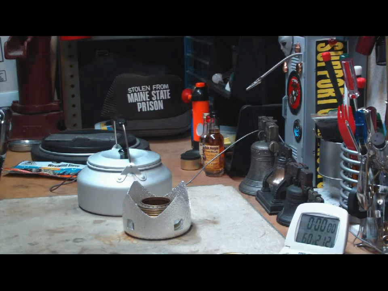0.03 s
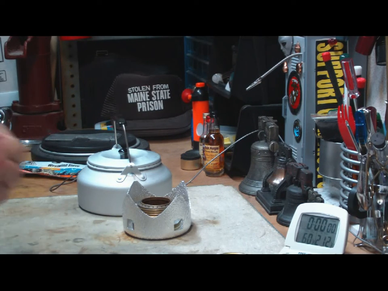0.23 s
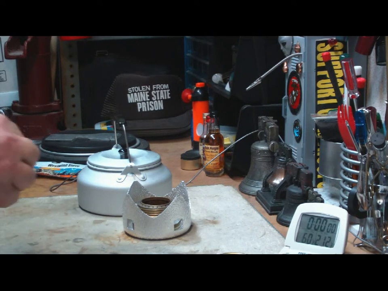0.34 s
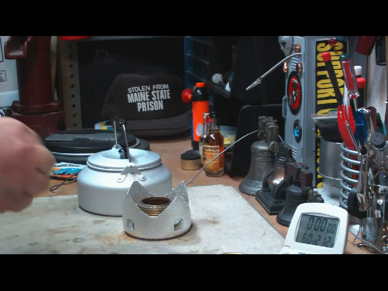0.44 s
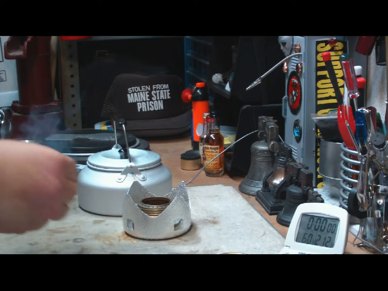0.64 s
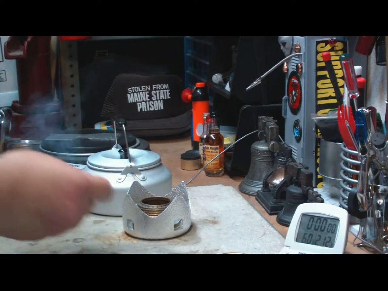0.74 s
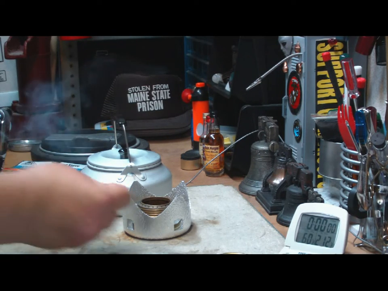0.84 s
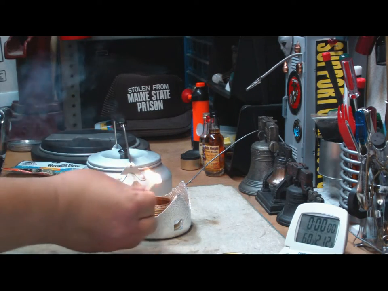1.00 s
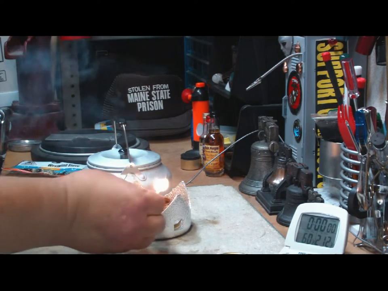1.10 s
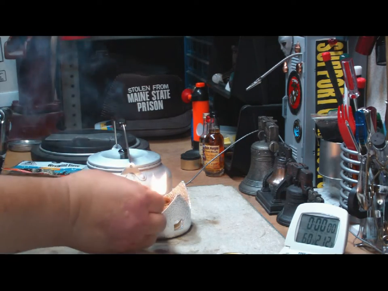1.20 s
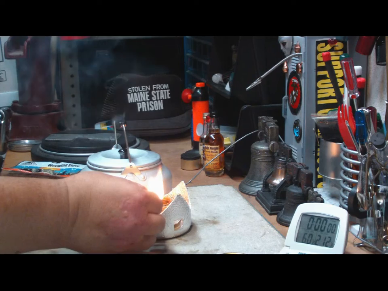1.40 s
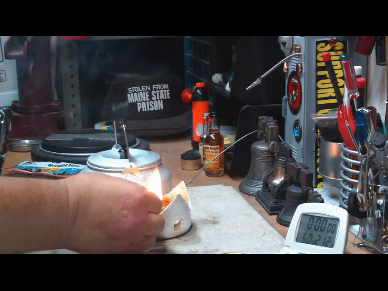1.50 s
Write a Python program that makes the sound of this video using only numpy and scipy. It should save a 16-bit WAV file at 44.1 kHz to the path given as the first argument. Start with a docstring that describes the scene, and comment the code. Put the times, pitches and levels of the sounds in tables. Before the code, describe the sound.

Single quick match strike in a quiet workshop, gritty and hollow, fading fast into soft background hiss

```python
"""Steady hiss and rumble of a small camera microphone fill a small quiet workshop throughout.
At a workbench a match is struck once along its box: its head catches and slips, and the hollow box rings.
Scattered clicks make the knocks and rasping grit, while the overloaded microphone's waveform jumps and sags.
The head then flares: coloured, sputtering clicks make a fading hiss.
Random echoes that die away band by band make the room's brief answer."""
import sys
import numpy as np
from scipy import signal
from scipy.fft import rfft, irfft
from scipy.io import wavfile
from scipy.ndimage import uniform_filter1d

SR = 44100
rng = np.random.default_rng(int(sys.argv[2]) if len(sys.argv) > 2 else 0)


def store_pcm(level_fs):
    """Save levels as 16-bit WAV."""
    pcm = np.round(np.clip(level_fs, -1, 1) * 32767).astype(np.int16)
    wavfile.write(sys.argv[1], SR, np.atleast_2d(pcm).T)


def voltage_ratio(level):
    """Linear amplitude factor for a level in decibels (scalar or array-like)."""
    return 10 ** (np.asarray(level, float) / 20)


N = 68355  # length in samples

# Course of the stroke, levels before each layer's own gain: start_s, knock_level_db, grit_level_db
STROKE_COURSE = [(.2085, -52, -70), (.219, -28, -37.5), (.222, -11.5, -26), (.230, -20.5, -20),
                 (.238, -24.5, -26.5), (.248, -31.5, -33), (.253, -36.5, -47), (.27, -69, -49)]


def evened(x):
    """Scales a signal to an rms (average strength) of 1."""
    return x / np.sqrt(np.mean(x ** 2) + 1e-20)


def read(points, hz):
    """Reads a table of values against pitch, on a log-frequency axis."""
    point_hz, value = np.transpose(points)
    return np.interp(np.log(hz + 1), np.log(point_hz + 1), value)


def level(curve, column):
    """Turns one dB column into a gain over time, silent outside the curve."""
    rows = np.array(curve)
    level_db = np.interp(np.arange(N) / SR, rows[:, 0], rows[:, column], -120, -120)
    return voltage_ratio(level_db)


def colour(x, points):
    """Filters a signal by a spectrum table in dB."""
    gain = voltage_ratio(read(points, np.fft.rfftfreq(N, 1 / SR)))
    return irfft(rfft(x) * gain, N)


def clicks(per_s, spread_db):
    """Makes single-sample clicks at random times, with random sign and uneven size."""
    size = voltage_ratio(spread_db * np.minimum(rng.exponential(1, N), 4))
    sign = rng.choice([-1., 1.], N)
    return size * sign * (rng.random(N) < per_s / SR)


def box():
    """Slips and small knocks ring the hollow cardboard, whose modes are decaying sine waves."""
    # Strongest slips of the head against the strip: start_s, peak_db (before slip_db and the bass cut)
    slips = [(.2088, -24), (.2147, -22), (.2178, -21), (.2203, -16), (.2212, -12), (.2237, -12),
             (.2256, -11), (.2290, -17), (.2315, -15), (.2350, -20), (.2418, -19), (.2450, -22),
             (.2478, -21), (.266, -31), (.317, -37)]
    # Ringing modes of the box: pitch_hz, relative_level_db, t60_s (time to fall by 60 dB)
    modes = [(442, -10, 0.098), (625, -16.5, 0.047), (668, -8.5, 0.049), (880, 0.5, 0.029),
             (960, -2, 0.053), (1012, 4.5, 0.038), (1298, 5, 0.04), (1280, 0.5, 0.016), (1386, 2, 0.029),
             (1620, -19, 0.013), (2020, -14, 0.072), (2930, -5, 0.043), (3716, -11.5, 0.063),
             (4250, -12.5, 0.034)]
    slip_db, knock_db, knocks_per_s = -1, -4.5, 2200
    low_cut_hz = 410

    t = np.arange(4000) / SR
    rings = np.array([voltage_ratio(db - 60 * t / t60) * np.sin(2 * np.pi * hz * t) for hz, db, t60 in modes])
    out = np.zeros(N)

    # Each slip weighs the modes a little differently.
    weights = voltage_ratio(2.5 * rng.standard_normal((len(slips), len(modes))))
    for (start_s, peak_db), weight in zip(slips, weights):
        ring = weight @ rings
        ring = ring / abs(ring).max()
        out[round(start_s * SR):][:len(t)] += voltage_ratio(peak_db + slip_db) * ring

    body = rings.sum(0)
    body = body / np.linalg.norm(body)
    knocks = evened(clicks(knocks_per_s, spread_db=5.6)) * level(STROKE_COURSE, column=1)
    out += voltage_ratio(knock_db) * signal.oaconvolve(knocks, body)[:N]

    # The box is too small for bass.
    low_cut = signal.butter(4, low_cut_hz, "high", fs=SR, output="sos")
    return signal.sosfilt(low_cut, out)


def grit():
    """Dense grains of the strip scrape the head: many coloured clicks follow the stroke."""
    # Spectrum of the scrape: pitch_hz, relative_level_db (per Hz)
    grit_colour = [(1060, -46), (1800, -18), (2030, -4), (2360, -13), (2850, 0), (3270, -1.5), (5290, -4.5),
                   (6820, -9.5), (9000, -10)]
    grit_db, grains_per_s, spread_db = 1, 7100, 4
    grains = evened(colour(clicks(grains_per_s, spread_db), grit_colour))
    return voltage_ratio(grit_db) * grains * level(STROKE_COURSE, column=2)


def flare():
    """The head burns off with a sputtering hiss: dense coloured clicks of wavering strength."""
    # Course of the flare: start_s, level_db (before flare_db)
    flare_course = [(.25, -41), (.265, -46), (.298, -51), (.309, -41), (.322, -51), (.4, -60), (.45, -65.5),
                    (.62, -63.5)]
    # Spectrum of the hiss: pitch_hz, relative_level_db (per Hz)
    flare_colour = [(1060, -29), (1800, -5.5), (2630, -3.5), (5910, -1.5), (7050, -4.5), (7300, -29),
                    (9490, -42), (16100, -120)]
    flare_db, clicks_per_s, sputter_db = 2.0, 9000, 1.4
    sputter = voltage_ratio(sputter_db * evened(uniform_filter1d(rng.standard_normal(N), 300)))
    hiss = colour(clicks(clicks_per_s, spread_db=4.3), flare_colour)
    return voltage_ratio(flare_db) * evened(hiss * sputter) * level(flare_course, column=1)


def overload_sag():
    """Overload of the microphone at the strike: a short positive push, then a negative sag that recovers."""
    push_s, snap_s, edge_s = .2208, .2263, .0003  # start of push, start of sag, softness of both
    push_db, sag_db, sag_s = -31, -31.5, .036  # sag_s: time constant of the recovery
    t = np.arange(N) / SR
    on, snap = [(1 + np.tanh((t - start_s) / edge_s)) / 2 for start_s in (push_s, snap_s)]
    recovery = np.exp(-np.maximum(t - snap_s, 0) / sag_s)
    return voltage_ratio(push_db) * on * (1 - snap) - voltage_ratio(sag_db) * snap * recovery


def room(x):
    """Answers a sound with sparse echoes of random sign, each band dying at its own speed."""
    # Decay of the room: pitch_hz, t60_s (time to fall by 60 dB)
    decay = [(300, 0.051), (600, 0.47), (1300, 0.42), (2500, 0.37), (6000, 0.34)]
    room_db, gap_s = -14, 0.011  # gap_s: wait before the first echoes
    taps = np.zeros(SR // 2)
    # One echo falls at random within every 20 samples.
    at = np.arange(round(gap_s * SR), SR // 2 - 20, 20)
    at = at + rng.integers(0, 20, len(at))
    taps[at] = rng.choice([-1., 1.], len(at))

    hz, t, bands = signal.stft(taps, SR, nperseg=256)
    fading = voltage_ratio(-60 * t / read(decay, hz)[:, None])
    tail = signal.istft(bands * fading, SR, nperseg=256)[1]
    tail = tail / np.linalg.norm(tail)
    return voltage_ratio(room_db) * signal.fftconvolve(x, tail)[:N]


def floor():
    """Steady hiss and rumble: random noise shaped by a spectrum, with faint drifting patches."""
    # Spectrum of the background: pitch_hz, relative_level_db (per Hz)
    floor_colour = [(5, -1), (15, -7), (45, 3), (100, -5), (170, -4.5), (300, -10), (920, -15),
                    (2000, -19.5), (5930, -23.5), (7300, -29.5)]
    floor_db, patchy_db, top_hz = -51.5, 1.01, 9000
    frames, hz = N // 512 + 5, np.fft.rfftfreq(2048, 1 / SR)
    real, imaginary, patches = rng.standard_normal((frames, 1025, 3)).T
    # Smooth the patches across pitch, then across time.
    patches = uniform_filter1d(patches, 30, axis=0)
    patches = evened(uniform_filter1d(patches, 6, axis=1))
    gain = voltage_ratio(read(floor_colour, hz)[:, None] + patchy_db * patches)
    bands = (real + 1j * imaginary) * gain * (hz < top_hz)[:, None]
    noise = signal.istft(bands, nperseg=2048, noverlap=1536)[1][:N]
    return voltage_ratio(floor_db) * evened(noise)


def scene():
    """Adds the match, the microphone's overload sag, the room's answer and the background, as one channel."""
    match = box() + grit() + flare()
    return (match + room(match) + overload_sag() + floor())[None]


def low_pass(x):
    """Removes everything above the highest recorded frequency."""
    return signal.sosfilt(signal.butter(12, 8090, fs=SR, output="sos"), x)


def record(dry):
    """Cuts the treble at a steep edge, lets the skirt above it pass only while strong, adds an offset."""
    edge_hz, edge_width_hz = 7140, 55
    skirt_db, skirt_db_per_khz, skirt_gate_db = -11, -33, -66
    offset = -0.00028  # constant shift of the waveform

    hz = np.fft.rfftfreq(N, 1 / SR)
    passed = (1 - np.tanh((hz - edge_hz) / edge_width_hz)) / 2
    slope = voltage_ratio(skirt_db + skirt_db_per_khz * np.maximum(hz - edge_hz, 0) / 1000)
    spectrum = rfft(dry)
    main = irfft(spectrum * passed, N)
    skirt = irfft(spectrum * (1 - passed) * slope, N)

    # The gate compares power, hence twice the dB; two averages soften its opening and closing.
    strong = uniform_filter1d(skirt ** 2, size=600) > voltage_ratio(2 * skirt_gate_db)
    gate = uniform_filter1d(uniform_filter1d(strong * 1., size=300), size=300)
    mix = main + gate * skirt + offset
    return low_pass(mix)


dry = scene()
out = record(dry)
store_pcm(out)
```